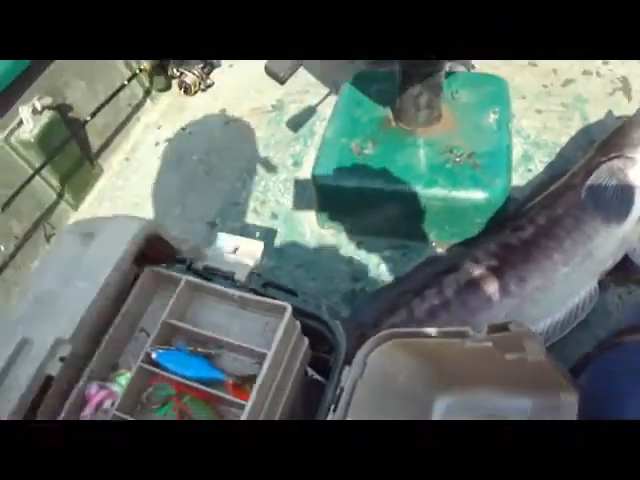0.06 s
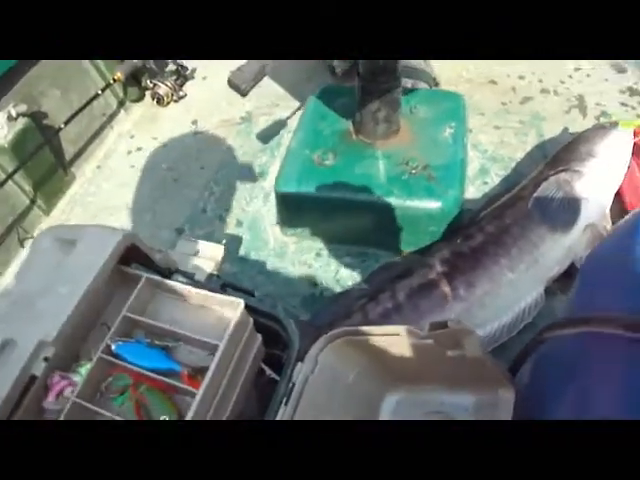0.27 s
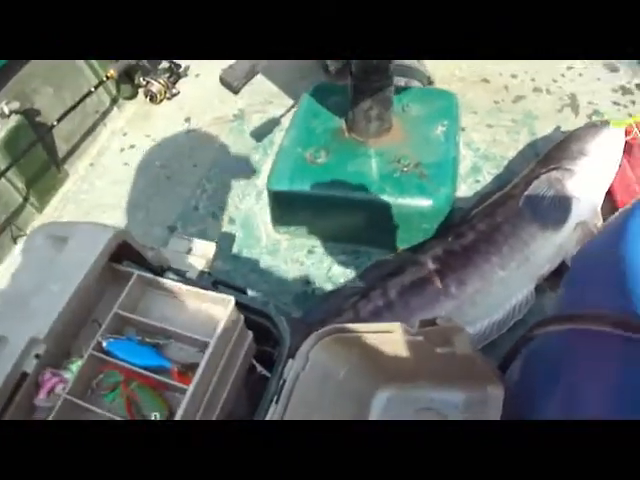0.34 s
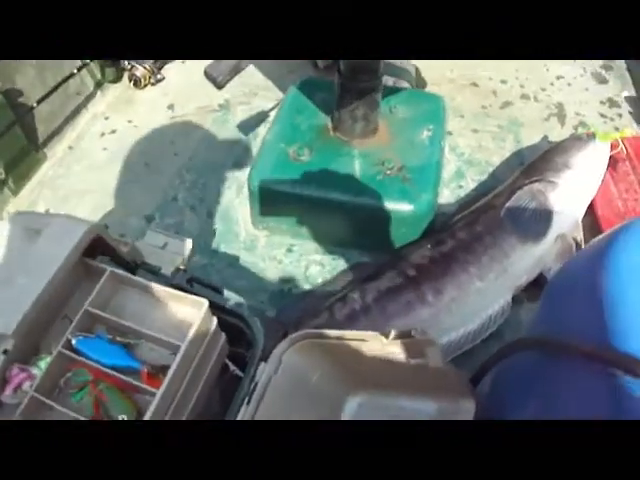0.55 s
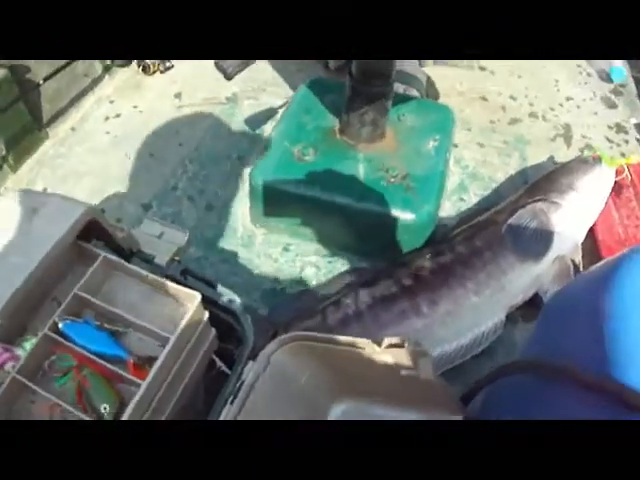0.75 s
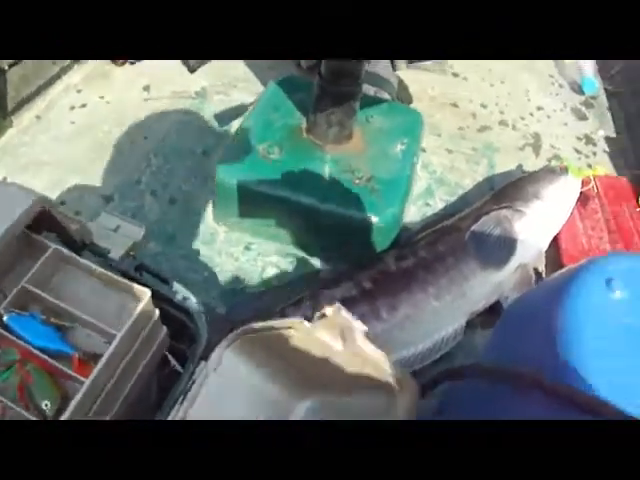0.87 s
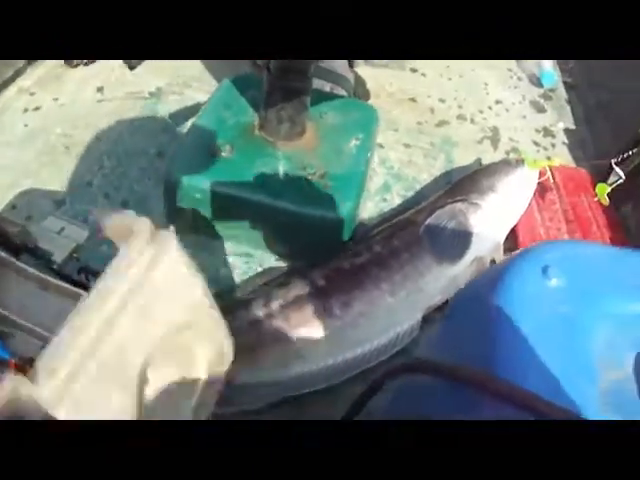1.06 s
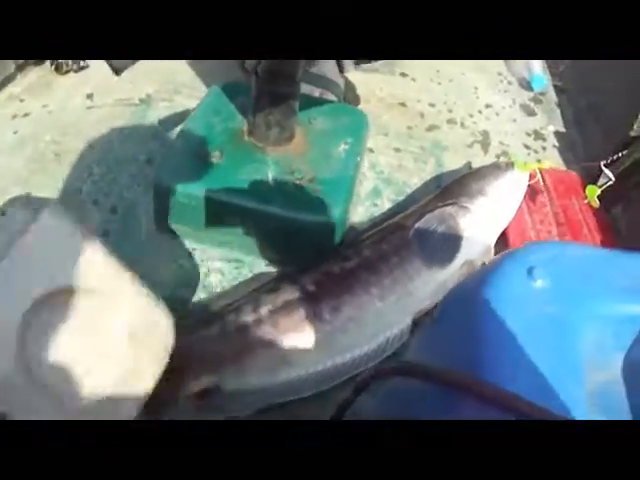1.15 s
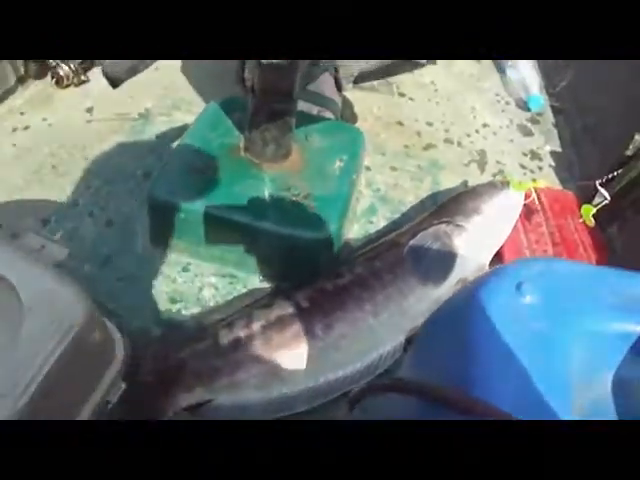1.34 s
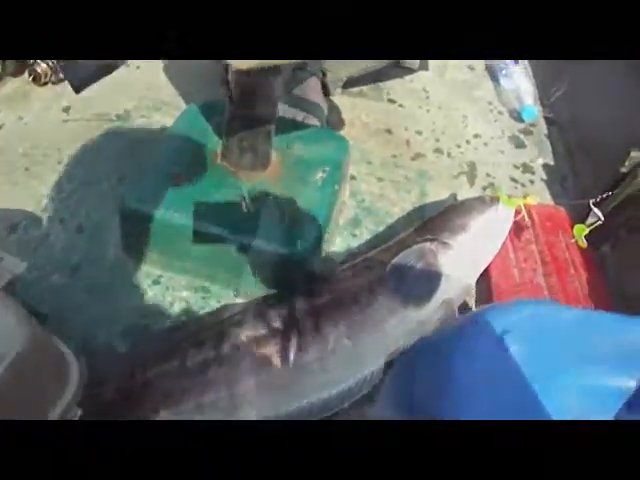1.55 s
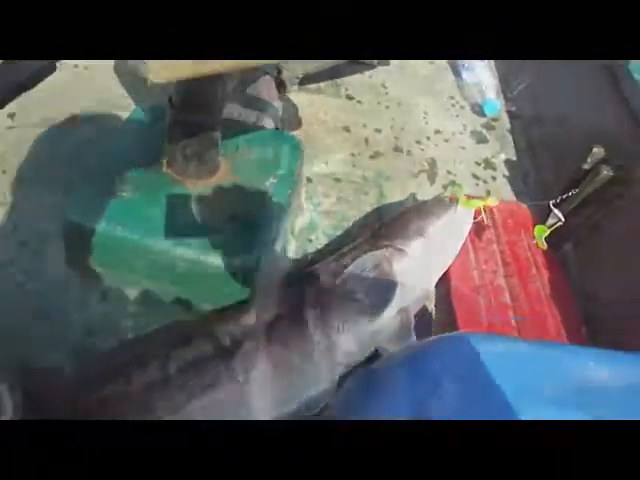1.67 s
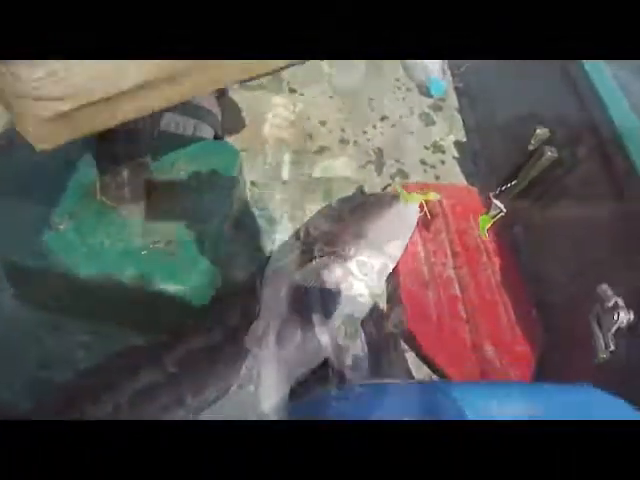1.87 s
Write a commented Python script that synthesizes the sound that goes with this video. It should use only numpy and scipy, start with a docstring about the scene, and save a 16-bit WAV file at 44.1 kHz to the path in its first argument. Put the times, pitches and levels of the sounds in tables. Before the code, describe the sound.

Three hard, hollow fish thumps on a boat deck, with clinking lure, loose tackle rattle and lapping water

```python
"""Three heavy thumps of a fish on a hollow boat deck, with a fainter knock ahead of the second.
Each thump is a burst of short damped notes, deck modes and noisy cracks; loose tackle rattles as dense noise grains.
A metal lure rings on from the first thump as damped and beating sines. Ticks, rubs, squeaks and bright rattle
resonances, made of resonant noise, and dull low bumps fall between, over lapping water, a far hiss and
light wind on the microphone, all shaped from noise."""
import sys
import numpy as np
from scipy import signal
from scipy.fft import rfft, irfft, next_fast_len
from scipy.io import wavfile
from scipy.ndimage import uniform_filter1d, map_coordinates

SR = 44100
rng = np.random.default_rng(int(sys.argv[2]) if len(sys.argv) > 2 else 0)


def log_audio(samples):
    """Write samples as a 16-bit WAV file to the path given in sys.argv[1]."""
    # one column per channel
    frames = np.atleast_2d(samples).T
    # limit to full scale, then quantise
    limited = np.clip(frames, -1, 1)
    pcm = np.round(limited * 32767).astype(np.int16)
    wavfile.write(sys.argv[1], SR, pcm)


def undo_db(level):
    """Turn decibels back into plain size, where 20 dB means ten times bigger."""
    steps = np.asarray(level, float) / 20
    return 10 ** steps


N = 83790  # samples, 1.9 s

# Bright colour shared by the cracks of the thumps and the tackle: freq_hz, gain_db
SIZZLE_TONE = [(880, 1), (1500, -1.5), (2870, -0.5), (3260, -7.5), (3910, -7), (4740, -12), (6620, -14.5),
               (7820, -22.5), (11000, -30.5), (14300, -38)]


def unit(x):
    """Scaled to rms 1."""
    return x / np.sqrt(np.mean(x ** 2) + 1e-20)


def curves(rows, outside=None):
    """One value per sample for each column after the time."""
    s, *columns = np.transpose(rows)
    t = np.arange(N) / SR
    return [np.interp(t, s, column, outside, outside) for column in columns]


def wobble(rate):
    """Smooth random curve, rate knots a second."""
    knots = rng.standard_normal(int(N * rate / SR) + 4)
    return map_coordinates(knots, [np.arange(N) * rate / SR])


def filtered(x, response):
    """x times a response of frequency."""
    m = next_fast_len(N + 8192)
    return irfft(rfft(x, m) * response(np.fft.rfftfreq(m, 1 / SR)), m)[..., :N]


def coloured(x, points):
    """x through (freq_hz, gain_db) points, joined along log frequency."""
    f, gain_db = np.transpose(points)
    return filtered(x, lambda hz: undo_db(np.interp(np.log(hz + 1), np.log(f + 1), gain_db)))


def resonance(hz, width_hz):
    """Causal band-pass response: two equal resonators in a row, each width_hz wide, for steep skirts."""
    return lambda f: (1j * f * width_hz / (hz * hz - f * f + 1j * f * width_hz)) ** 2


def ring(t, hz, t60, attack=0.00071):
    """A damped sine that falls 60 dB in t60 s, with an attack time constant in s."""
    return np.sin(2 * np.pi * hz * t) * undo_db(-60 * t / t60) * (1 - np.exp(-t / attack))


def add(track, s, sound):
    """Lay a sound on the track at s seconds."""
    part = track[round(s * SR):][:len(sound)]
    part += sound[:len(part)]


def wind():
    """Lumpy low buffeting at the microphone: low noise with a slow and a quick change of level."""
    # Strength of the wind, ahead of its quick wobble: time_s, level_db
    gusts = [(0, -60), (.14, -54.5), (.22, -56), (.4, -55), (.68, -56.5), (.76, -65.5), (.98, -66.5),
             (1.05, -48), (1.18, -48), (1.25, -61), (1.38, -68), (1.43, -51), (1.55, -42), (1.65, -37),
             (1.72, -46), (1.8, -42), (1.9, -47.5)]
    # Colour of the buffeting: freq_hz, gain_db
    buffet_tone = [(12, -57), (20, -20), (69, 4), (124, 1.5), (193, -8), (221, -3.5), (300, -7), (390, -84)]
    level_db = curves(gusts)[0] - 1.5 * wobble(30.14)
    return undo_db(level_db) * unit(coloured(rng.standard_normal(N), buffet_tone))


def water():
    """Lapping against the hull, noise patchy in time and pitch, over a far hiss that drifts in level."""
    # Strength of the lapping, ahead of its small wobble: time_s, level_db
    lap_levels = [(0.0, -48.5), (0.174, -50.5), (0.364, -46), (0.682, -47.5), (0.936, -47), (1.496, -45),
                  (1.55, -35), (1.682, -51), (1.9, -52)]
    # Colour of the lapping: freq_hz, gain_db
    lap_tone = [(88, -78), (150, -16), (415, -10.5), (496, -11.5), (584, -11.5), (759, -10.5),
                (3900, -29.5), (5200, -32), (8800, -120)]
    # Strength of the far hiss: time_s, level_db
    hiss_levels = [(0, -57), (.5, -51.5), (1.3, -57.5), (1.9, -56)]
    # Colour of the far hiss: freq_hz, gain_db
    hiss_tone = [(880, -32), (1500, -1), (3850, -9.5), (4220, -8.5), (4900, -11.5), (6620, -13),
                 (11000, -20.5), (14300, -55)]

    z = signal.stft(rng.standard_normal(N), nperseg=256)[2]
    # Smooth random gains over 5 bands and 6 frames make the patches
    patches = uniform_filter1d(uniform_filter1d(rng.standard_normal(z.shape), 5, 0), 6, 1)
    patchy = signal.istft(z * undo_db(2.9 * unit(patches)), nperseg=256)[1][:N]
    lap_db = curves(lap_levels)[0] + 0.3 * wobble(24.5)
    lap = undo_db(lap_db) * unit(coloured(patchy, lap_tone))
    hiss = undo_db(curves(hiss_levels)[0]) * unit(coloured(rng.standard_normal(N), hiss_tone))
    return lap + hiss


def bumps():
    """Soft low pushes through the hull: slow-starting sines that die in a few cycles."""
    # Dull bumps: start_s, level_db (ahead of attack and doubling), pitch_hz
    pushes = [(0.131, -34, 113), (0.476, -36, 62.4), (0.491, -33.5, 111), (0.554, -39, 75),
              (0.614, -32.5, 198), (1.617, -17.5, 168), (1.646, -19, 140), (1.659, -38, 99.6),
              (1.688, -22, 166), (1.794, -22.5, 134), (1.873, -26.5, 152)]
    cycles = 5.5  # in the 60 dB decay
    out, t = np.zeros(N), np.arange(SR // 10) / SR
    for s, db, hz in pushes:
        add(out, s, 2 * undo_db(db) * ring(t, hz, cycles / hz, attack=0.0077))
    return out


def rubs_and_resonances():
    """Rubs, squeaks and bright rattle resonances: noise through one resonance, swelling and fading."""
    # Sounds: start_s, length_s, level_db (ahead of the swell), pitch_hz, width_hz (of each resonator)
    swells = [(0.144, 0.074, -46.5, 915, 280), (0.164, 0.014, -38.5, 377, 23),
              (0.237, 0.067, -29.5, 3770, 1200), (0.259, 0.081, -36.5, 6580, 1400),
              (0.673, 0.057, -37, 670, 220), (0.658, 0.064, -42.5, 1690, 1700),
              (0.736, 0.034, -44.5, 875, 260), (1.011, 0.079, -43, 645, 290),
              (1.199, 0.049, -45.5, 1460, 2700), (1.251, 0.045, -49, 926, 170),
              (1.408, 0.12, -55.5, 6200, 130), (1.561, 0.15, -57.5, 6490, 170),
              (1.716, 0.047, -37, 942, 63), (1.722, 0.015, -40.5, 530, 120), (1.878, 0.027, -53, 3830, 18)]
    out = np.zeros(N)
    for s, length, db, hz, width_hz in swells:
        noise = unit(filtered(rng.standard_normal(N), resonance(hz, width_hz)))
        n = round(length * SR)
        swell = np.sin(np.pi * (np.arange(n) / n) ** 0.65)
        add(out, s, undo_db(db) * unit(noise[:n]) * swell)
    return out


def ticks():
    """A small hard contact: a partly noisy note plus a shorter wide click."""
    # Contacts: start_s, level_db (ahead of attack and halving), pitch_hz, t60_s, click_db (over the level)
    taps = [(0.199, -34, 5000, 0.013, -2), (.334, -28, 5540, 0.017, -20), (.343, -31, 2090, 0.03, 5),
            (.354, -31, 5450, 0.023, -22), (.367, -31, 744, 0.091, -22), (.37, -27.5, 2040, 0.032, -16),
            (.421, -31.5, 1220, 0.027, -4), (0.4264, -26, 3000, 0.019, 12), (.555, -26, 720, 0.011, -11),
            (0.578, -30, 1104, 0.024, 4.5), (.599, -27.5, 2380, 0.024, 7), (.88, -34, 600, 0.068, -29),
            (1.102, -35, 2330, 0.054, -5), (1.107, -29, 630, 0.089, -31), (1.125, -16, 606, 0.033, -25),
            (1.127, -33, 5700, 0.033, 1), (1.233, -18.5, 1662, 0.033, -2.5),
            (1.3059, -25.5, 2680, 0.031, 0), (1.328, -22, 857, 0.033, -5.5), (1.343, -24, 2560, 0.02, 2)]
    # Colour of the click: freq_hz, gain_db
    click_tone = [(500, 5), (1500, 4.5), (4000, 5), (7000, -2), (11000, -8), (14000, -58)]
    width_share, clear_share = 0.45, 0.9  # noise width per pitch, sine peak over noise rms
    click_life = 0.7  # click t60 over note t60
    out, t = np.zeros(N), np.arange(SR // 10) / SR
    for s, db, hz, t60, click_db in taps:
        noise = rng.standard_normal((2, len(t)))
        rough = unit(filtered(noise[0], resonance(hz, width_share * hz))[:len(t)])
        note = rough + clear_share * np.sin(2 * np.pi * hz * t)
        click = unit(coloured(noise[1], click_tone)[:len(t)])
        click = undo_db(click_db - 60 * t / (click_life * t60)) * click
        attack = 1 - np.exp(-t / 0.00089)
        add(out, s, undo_db(db) * attack * (undo_db(-60 * t / t60) * note + click) / 2)
    return out


def lure():
    """Damped metal modes, some beating with a close twin, each with a small random level wobble, and one long note."""
    # Damped modes: pitch_hz, level_db (ahead of the wobble), t60_s, beat_hz, twin_share (signed amplitude)
    metal_modes = [(3548, -30, .36, 0, 0), (4301, -33, .33, 0, 0), (5437, -35, .22, 0, 0),
                   (6180, -40, .42, 0, 0), (6385, -53, 2.2, 7.4, .8), (9620, -53, .6, 4.6, -.95)]
    # The longest mode comes and goes, with no decay or wobble of its own: time_s, level_db (rms)
    long_levels = [(.3, -62), (.42, -64), (.44, -53), (.55, -58), (.58, -68), (.7, -66), (.72, -56),
                   (.9, -58), (.94, -72), (.99, -72), (1.015, -54), (1.18, -56), (1.2, -80)]
    start_s, long_hz = 0.25, 4146
    wobble_db, wobble_per_s = 2.5, 35
    out, t = np.zeros(N), np.arange(N) / SR
    for hz, db, t60, beat, twin in metal_modes:
        level_db = db + wobble_db * wobble(wobble_per_s)
        lower = ring(t, hz - beat / 2, t60, attack=0.02)
        upper = ring(t, hz + beat / 2, t60, attack=0.02)
        add(out, start_s, undo_db(level_db) * (lower + twin * upper))
    long_level = np.sqrt(2) * undo_db(curves(long_levels, outside=-120)[0])
    return out + long_level * np.sin(2 * np.pi * long_hz * t)


def contacts(spectrum):
    """Dense uneven contacts, each a few ms of noise, in a colour."""
    per_s, spread_db, grain_t60 = 1200, 4, 0.01  # grain_t60 in s
    hits = (rng.random(N) < per_s / SR) * undo_db(spread_db * rng.standard_normal(N))
    decay = undo_db(-60 * np.arange(400) / SR / grain_t60)
    grains = np.convolve(hits, decay)[:N] * rng.standard_normal(N)
    return unit(coloured(grains, spectrum))


def rattle():
    """Loose tackle on the deck: its contacts excite the deck's body, its mids and a bright sizzle."""
    # One list a rattle: time_s, level_db (ahead of the trim), mids_db and treble_db (over the level)
    rattles = [
        [(0.228, -26, 2.5, 3.5), (0.252, -20, 4.5, 0), (0.278, -13.5, -6, -8), (0.362, -42, 0, 3.5),
         (0.385, -56, 11, -9)],
        [(1.383, -14.5, -4.5, -9.5), (1.471, -27.5, -4, -7), (1.509, -23, -19, -28)],
        [(1.513, -11, -12, -11.5), (1.53, -18.5, -7, -8.5), (1.538, -18, -6.5, -1), (1.557, -19, -5, -12.5),
         (1.601, -21, -5.5, -8), (1.65, -51, -12, -13)],
    ]
    # Colour of the deck's body: freq_hz, gain_db
    body_tone = [(76, -66), (130, -9), (166, -1.5), (199, 5), (381, -2), (621, 0.5), (850, -10),
                 (1100, -66)]
    # Colour of the mids: freq_hz, gain_db
    mids_tone = [(440, -46), (750, -4), (938, 1.5), (1020, -1), (2100, -8.5), (2730, -33)]
    trim_db = -4
    body, mids, sizzle = contacts(body_tone), contacts(mids_tone), contacts(SIZZLE_TONE)
    out = np.zeros(N)
    for rows in rattles:
        level_db, mids_db, treble_db = curves(rows)
        # Silent before the first row and after the last
        on = curves([(row[0], 1) for row in rows], outside=0)[0]
        mix = body + undo_db(mids_db) * mids + undo_db(treble_db) * sizzle
        out += on * undo_db(level_db + trim_db) * mix
    return out


def knocks():
    """Fish on deck: each blow has its own short note, the deck's modes near that note and a noisy crack."""
    # Blows: start_s, level_db (ahead of attack and bass cut), pitch_hz, crack_db (over it, ahead of doubling)
    blows = [(0.225, -9.5, 333, -32), (.2292, -3.5, 1140, -10), (.2305, -5.5, 750, -24),
             (.2345, -3.5, 780, -19), (.236, -12, 310, -30), (.2455, -3, 1020, -7), (.257, -6.5, 403, -11),
             (.273, -5.5, 201, -12.5), (.296, -10.5, 806, -13), (1.106, -22.5, 1190, -20),
             (1.1145, -16, 1160, -4), (1.1168, -21, 654, -27), (1.382, -2.5, 480, -6.5),
             (1.386, -6, 230, -34), (1.3912, -13, 706, 3), (1.399, -6, 220, -28), (1.41, -14.5, 710, -17),
             (1.421, -18, 450, -12), (1.471, -25, 560, -26), (1.511, -2, 258, -26), (1.521, -3, 206, -26),
             (1.5355, -5.5, 615, -4), (1.54, -12.5, 615, -24), (1.546, -15.5, 571, -3),
             (1.566, -12.5, 520, -21), (1.5935, -9.5, 640, -8), (1.604, -18, 420, -25)]
    # Modes of the hollow deck: pitch_hz, level_db (ahead of scatter, reach and deck_db), t60_s
    deck_modes = [(220, -2.5, 0.12), (325, 4, 0.087), (450, -0.5, 0.082), (560, -11.5, 0.1),
                  (615, -7, 0.084), (722, -8.5, 0.12), (803, -10.5, 0.13), (1152, -5.5, 0.044),
                  (1303, -10, 0.055), (1820, -3, 0.041)]
    note_cycles, longest_t60 = 13.4, 0.036  # cycles in the 60 dB decay; s, flesh damps the low notes
    deck_db, scatter_db = -7, 2.9
    reach_db_per_oct = 12  # modes far from a blow's pitch ring less
    crack_t60 = 0.011  # s
    notes, cracks, t = np.zeros(N), np.zeros(N), np.arange(SR // 5) / SR
    for s, db, hz, crack_db in blows:
        note = ring(t, hz, min(note_cycles / hz, longest_t60))
        deck = np.zeros(len(t))
        for mode_hz, mode_db, t60 in deck_modes:
            reach_db = reach_db_per_oct * abs(np.log2(mode_hz / hz))
            deck += undo_db(mode_db + rng.normal(0, scatter_db) - reach_db) * ring(t, mode_hz, t60)
        add(notes, s, undo_db(db) * (note + undo_db(deck_db) * deck))
        add(cracks, s, undo_db(db + crack_db - 60 * t / crack_t60) * rng.standard_normal(len(t)))
    notes = filtered(notes, lambda hz: (1j * hz / (1j * hz + 130)) ** 4)  # bass cut
    return notes + 2 * coloured(cracks, SIZZLE_TONE)


def scene():
    """All sources, mono."""
    background = wind() + water() + bumps()
    small_sounds = rubs_and_resonances() + ticks() + lure()
    return (background + small_sounds + rattle() + knocks())[None]


def band_limit(x):
    """A steep low-pass at the top of the band."""
    return signal.sosfilt(signal.butter(12, 12150, fs=SR, output="sos"), x)


def record(dry):
    """Soft clipping towards 0.8 of full scale, a bass cut, then a dulled and closed treble."""
    clipped = dry / (1 + np.abs(dry / 0.8) ** 4) ** (1 / 4)

    def response(hz):
        bass_cut = (1j * hz / (1j * hz + 40)) ** 3
        # 21 dB down from 11000 Hz, silent from 12150 Hz
        treble = np.where(hz < 11000, 1, undo_db(-21) * (hz < 12150))
        return bass_cut * treble

    return band_limit(filtered(clipped, response))


dry = scene()
out = record(dry)
log_audio(out)
```